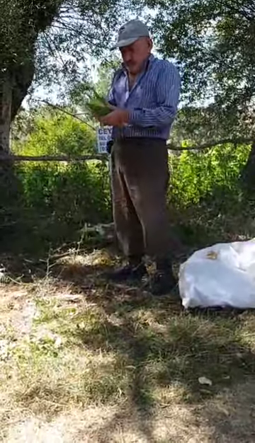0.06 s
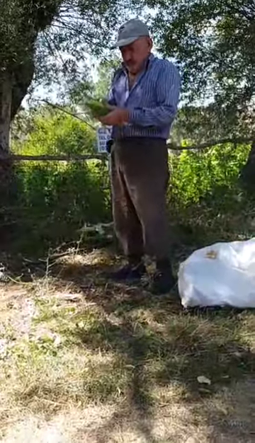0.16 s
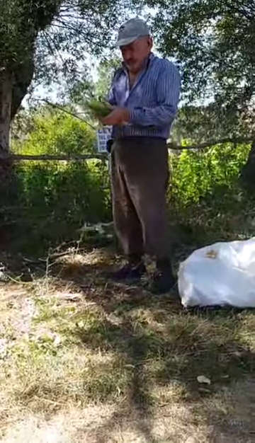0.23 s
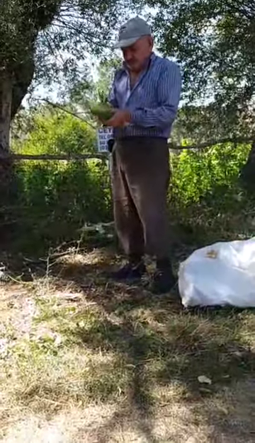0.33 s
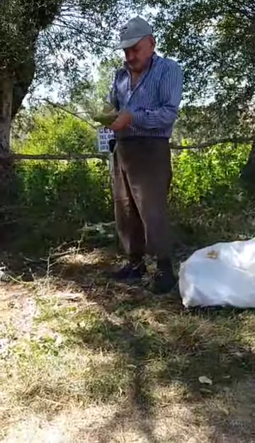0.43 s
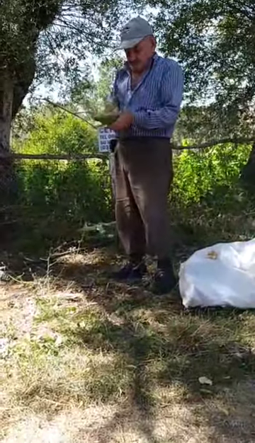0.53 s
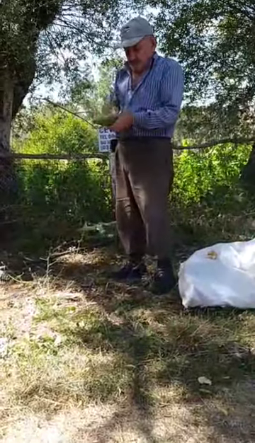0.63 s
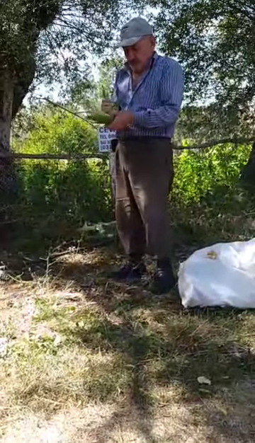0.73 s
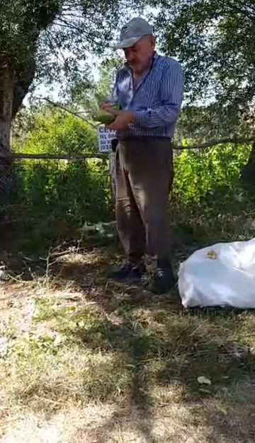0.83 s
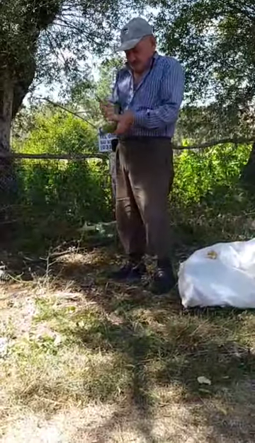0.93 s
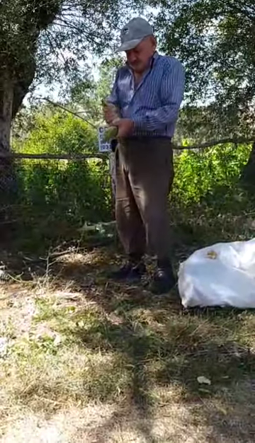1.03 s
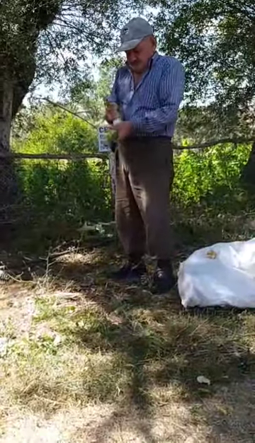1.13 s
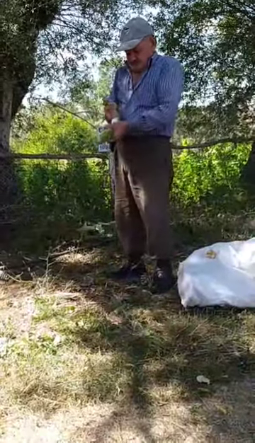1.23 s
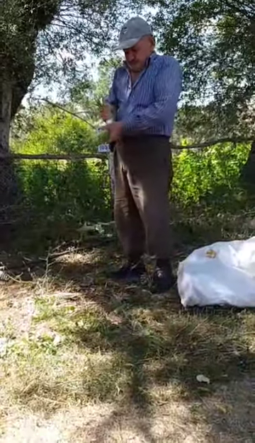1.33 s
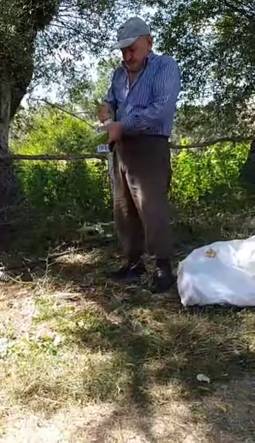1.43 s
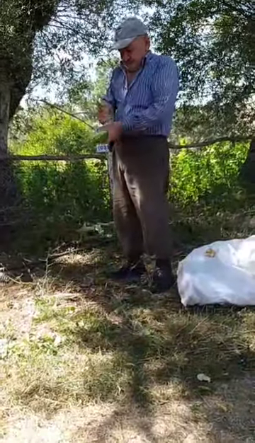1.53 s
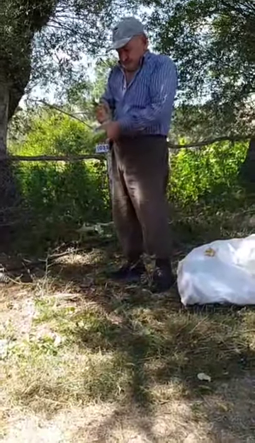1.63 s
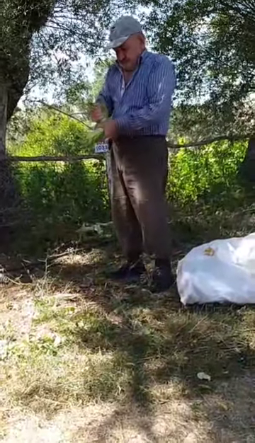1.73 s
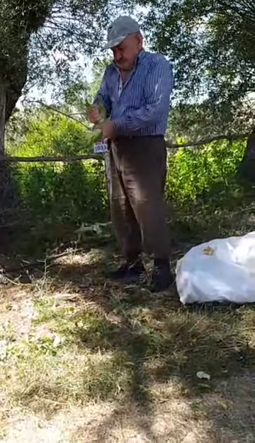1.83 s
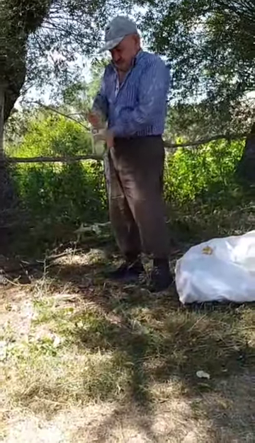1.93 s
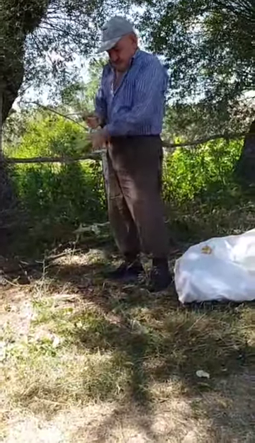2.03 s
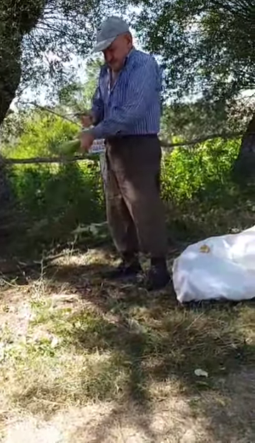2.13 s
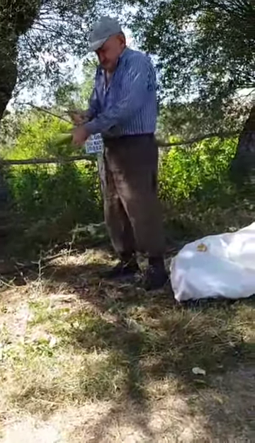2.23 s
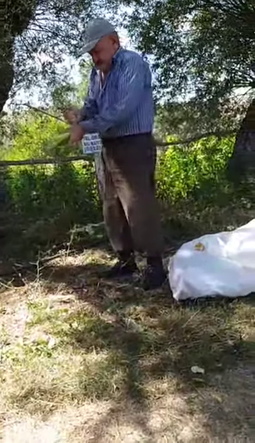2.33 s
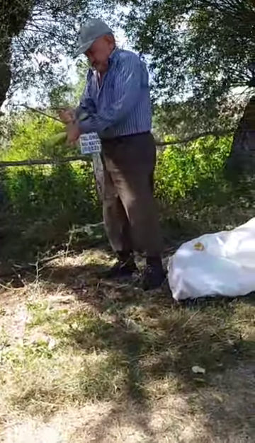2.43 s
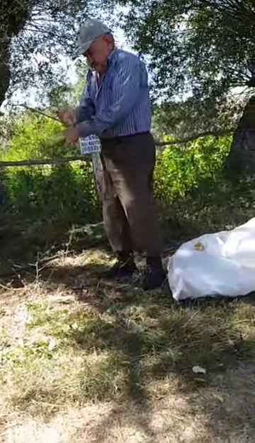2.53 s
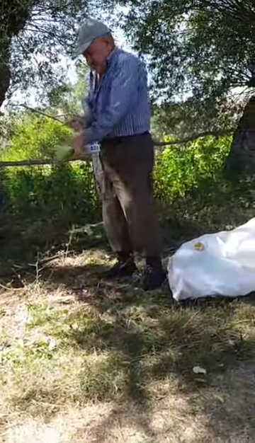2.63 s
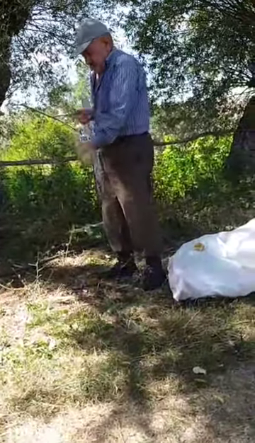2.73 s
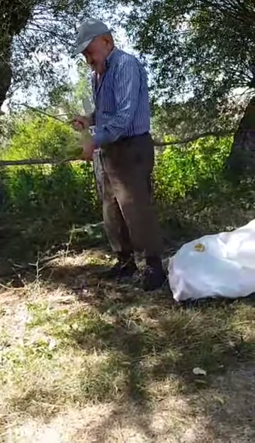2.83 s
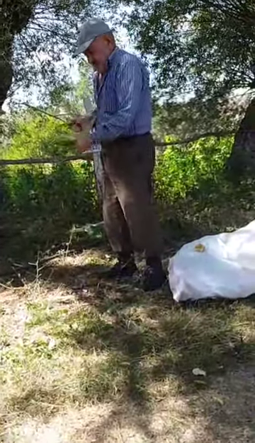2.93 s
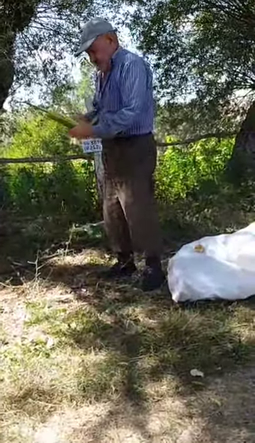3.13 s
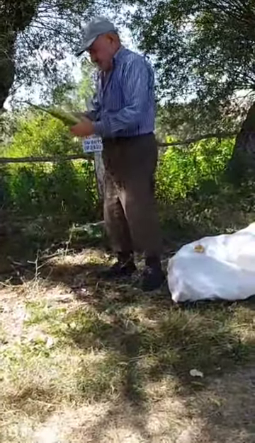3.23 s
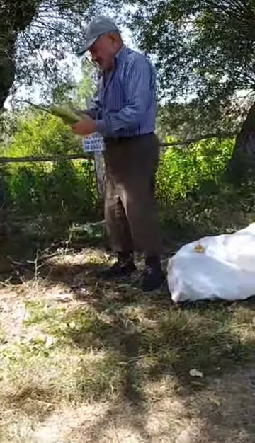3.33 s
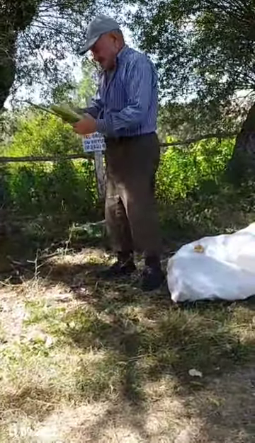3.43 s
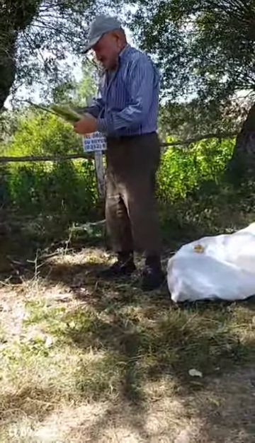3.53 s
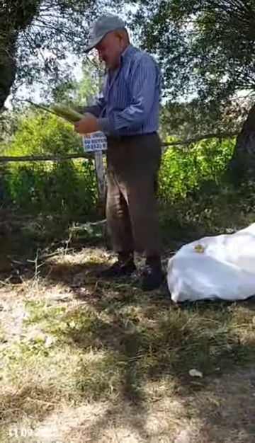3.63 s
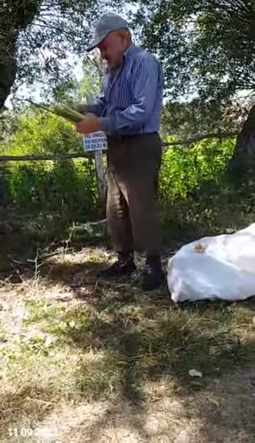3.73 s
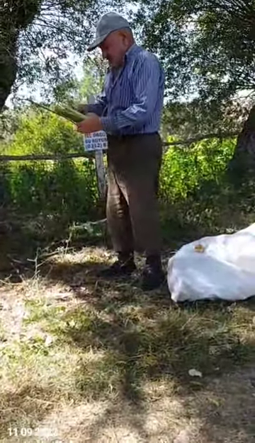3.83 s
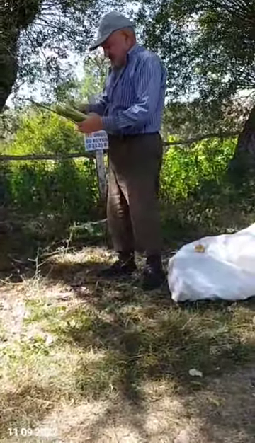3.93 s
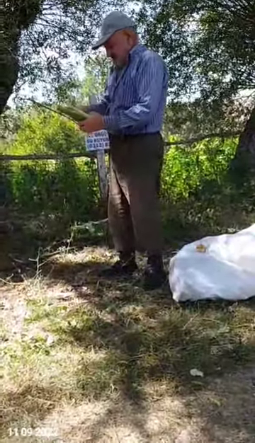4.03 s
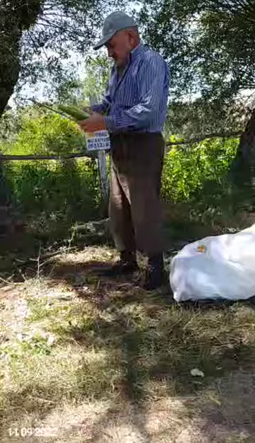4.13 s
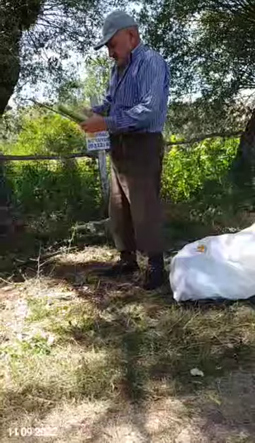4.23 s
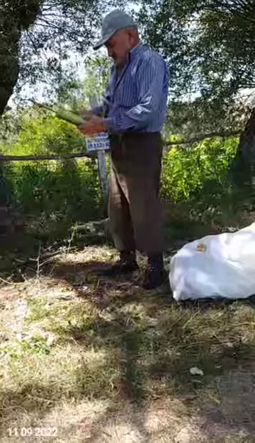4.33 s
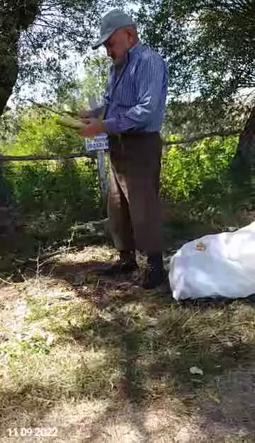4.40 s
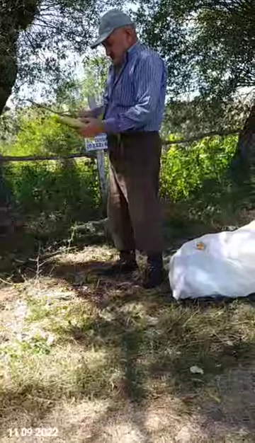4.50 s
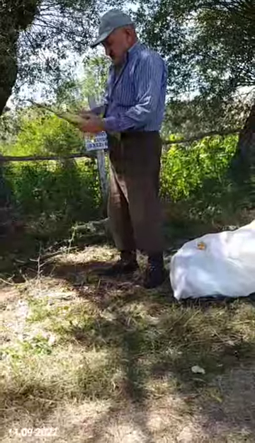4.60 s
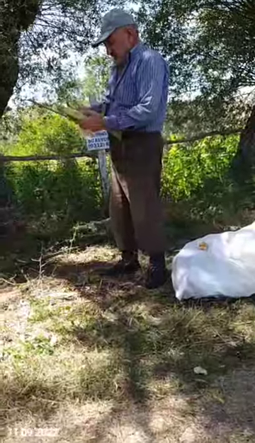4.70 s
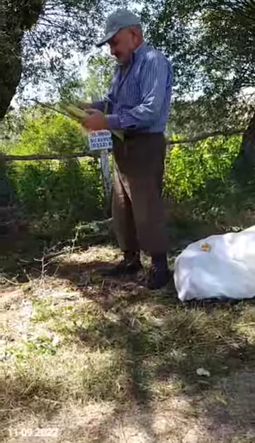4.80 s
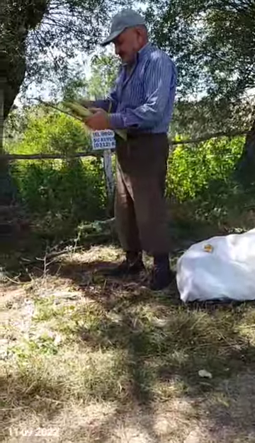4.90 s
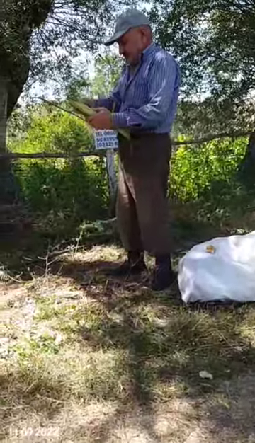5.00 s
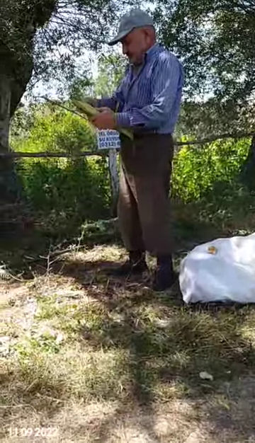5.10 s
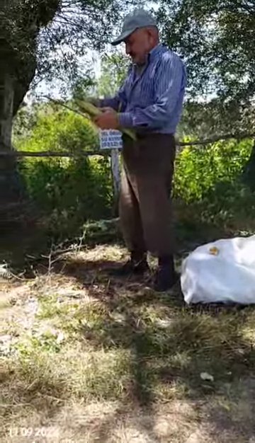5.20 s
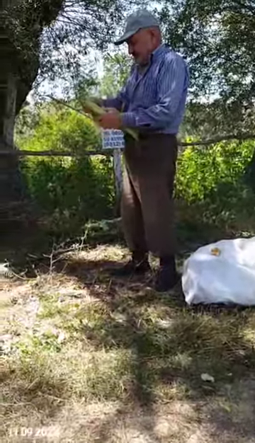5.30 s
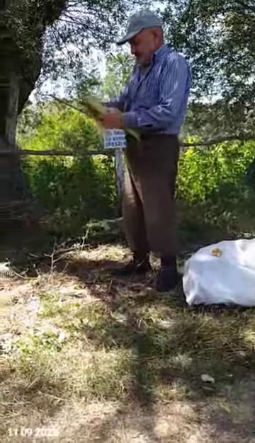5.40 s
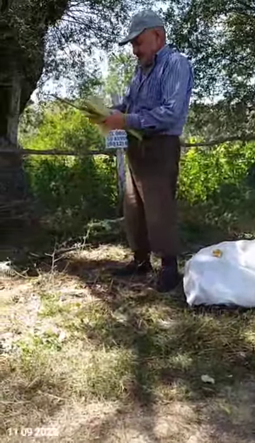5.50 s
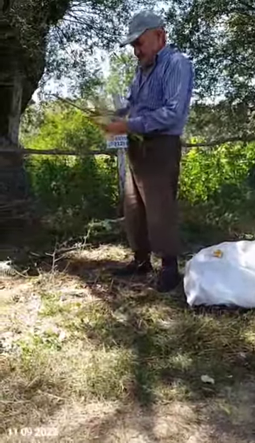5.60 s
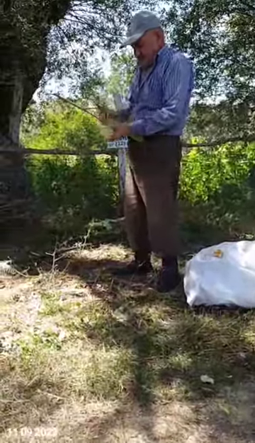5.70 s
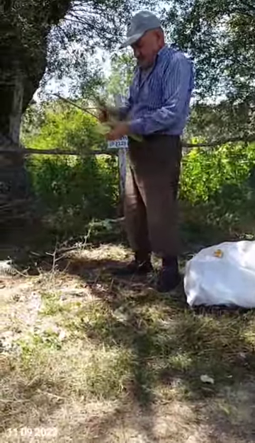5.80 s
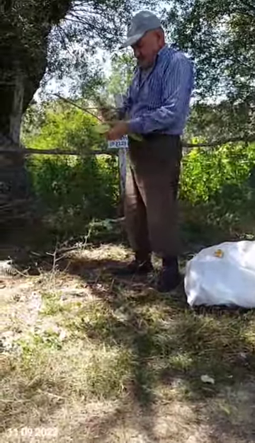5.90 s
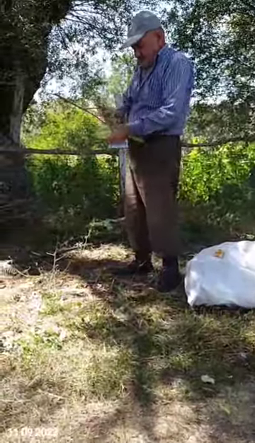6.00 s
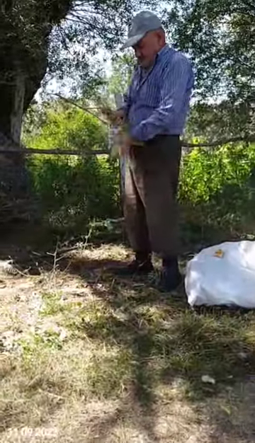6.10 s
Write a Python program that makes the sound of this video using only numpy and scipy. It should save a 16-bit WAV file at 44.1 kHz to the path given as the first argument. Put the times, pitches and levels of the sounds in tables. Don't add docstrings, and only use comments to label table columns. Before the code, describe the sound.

Dry, bright husk sounds come in uneven bursts: rustle, rip, crack, pause. The strongest tear is near the middle, where fibres burst and the stalk gives way with a short low rumble. After a calmer stretch of handling, leaves rustle and husks rip again with brief cracks and a small wet squeal. The open-air setting is quiet, with a low far hum, gentle wind buffeting the phone microphones early on, and steady hiss.

```python
import sys
import numpy as np
from scipy import signal
from scipy.fft import rfft, irfft
from scipy.io import wavfile
from scipy.ndimage import uniform_filter1d

SR = 44100
rng = np.random.default_rng(int(sys.argv[2]) if len(sys.argv) > 2 else 0)


def store_pcm(level_fs):
    pcm = np.round(np.clip(level_fs, -1, 1) * 32767).astype(np.int16)
    wavfile.write(sys.argv[1], SR, np.atleast_2d(pcm).T)


def decibels_to_gain(level_db):
    exponent = np.asarray(level_db, float) / 20
    return 10 ** exponent


N = 271215
TIME = np.arange(N) / SR

# (rise and fall span 20 dB, here and in every swell below)
RUSTLES = [(.1, -64, 0.45, 0.65, -12), (.362, -56, 0.26, 0.14, -11), (.82, -58.5, 0.073, 0.18, -10.5),
           (.944, -58, 0.093, 0.16, -12), (1.071, -54.5, 0.044, 0.077, -8.5),
           (1.402, -58.5, 0.45, 0.14, -9.5), (1.549, -49.5, 0.12, .15, -15),
           (1.805, -53.5, 0.017, 0.069, -18), (2.021, -52.5, 0.038, 0.042, -9), (2.09, -60, 0.04, 0.16, -9),
           (2.374, -56.5, 0.15, 0.035, -10.5), (2.72, -57, 0.072, .03, -28), (3.042, -54, .055, 0.068, -20),
           (3.95, -75.5, 0.055, 0.05, 11.5), (4.09, -62, 0.24, 0.16, -24), (4.26, -72, 0.88, 0.19, 2.5),
           (4.48, -50, 0.22, 0.14, -11.5), (4.95, -67.5, 1.7, 2, -7.5), (5.42, -68, 0.34, 0.1, -9),
           (5.5, -56, 0.085, 0.32, -10), (5.919, -57.5, 0.088, 0.093, -14), (5.99, -56.5, 0.05, 0.58, -31),
           (6.13, -66, 0.34, .3, 0.5)]
# start t/s, hold/s, fibre level/dB, release/s, sheet minus fibre/dB
RIPS = [(0.495, 0.095, -51.5, 0.17, -11), (0.558, 0.12, -55.5, -0.28, -7),
        (1.097, 0.072, -48.5, -0.25, -12), (1.17, 0.083, -46.5, -0.32, -9.5),
        (1.262, 0.0059, -47.5, 0.04, -14), (2.04, 0.023, -40, -0.2545, -10.5), (2.743, 0.016, -33.5, 0, -4),
        (2.763, 0.02, -33, 0.0185, -8.5), (5.57, 0.056, -48.5, 0.21, -10.5),
        (5.662, 0.023, -47.5, 0.12, -5), (5.683, 0.019, -44, .07, -10)]
# f/Hz, density/dB per Hz
FIBRE_COLOUR = [(1800, -64), (3000, -14), (3900, 5.5), (4800, -5.5), (6500, -5.1), (8000, -4), (10000, -1),
                (12500, -7), (15500, -8)]
# f/Hz, density/dB per Hz
SHEET_COLOUR = [(650, -14), (1000, 4), (1400, 2.4), (1900, 2.5), (2500, 4), (3100, 4.5), (4200, -25)]
# f/Hz, density/dB per Hz
COB_COLOUR = [(300, -25.5), (450, -10.5), (750, 8), (1000, 6), (1400, -20)]
# t/s, peak level/dB, middle minus top/dB
CRACKS = [(0.4825, -28.5, -26), (0.5821, -25, -11), (1.0947, -30.5, -6), (1.1229, -27.5, -8),
          (1.1454, -28, -11), (1.1817, -19.5, -24), (1.1924, -19.5, -14.5), (1.2411, -8, -21),
          (1.7921, -17.5, -21.5), (2.031, -28, -13), (2.0393, -9.5, -18), (2.0442, -10, -6),
          (5.618, -18, -9), (2.7345, -11, -14), (2.7391, -10.5, -16), (2.7478, -27, -18),
          (5.5887, -17, -40), (2.7675, -19, 1), (2.779, -25, -22), (2.7864, -15.5, -22), (4.592, -30, -37),
          (5.5036, -25.5, -22), (5.5857, -21, -31), (5.603, -23, -22), (5.6125, -18, -16.5),
          (5.6882, -29, -19), (5.6685, -17.5, -29), (5.744, -27.5, -3), (5.7698, -22, -16),
          (5.976, -33, -30)]
# f/Hz, density/dB per Hz
RIB_MIDDLE_COLOUR = [(700, -5), (1300, -5.5), (2200, 1.5), (3600, 7), (5500, -17.5), (7000, -11.5)]
# t/s, peak level/dB, f/Hz, t60/s, rise/ms
KNOCKS = [
    (0.68, -52.5, 370, 0.086, 4.5),
    (2.236, -45.5, 423, 0.036, 1.1),
    (2.546, -53.5, 260, 0.2, 2.9),
    (2.754, -54, 184, 0.066, 3.1),
    (2.81, -40.5, 415, 0.056, 9),
    (3.947, -38.5, 230, 0.028, 2.9),
]
# t/s, level/dB
STALK_BREAK = [
    (2.71, -64),
    (2.728, -62),
    (2.752, -36.5),
    (2.77, -29.5),
    (2.8, -38.5),
    (2.818, -34),
    (2.958, -59.5),
    (3.0, -57),
]
# f/Hz, density/dB per Hz
STALK_COLOUR = [(59, -37), (100, -25), (124, -21), (146, -7.5), (216, -8.5), (253, -10.5), (388, -4),
                (550, -26), (720, -46), (1210, -120)]
# t/s, pitch f/Hz, level/dB
SQUEAL = [
    (5.644, 1326, -65),
    (5.663, 1296, -42),
    (5.701, 1427, -43),
    (5.741, 1443, -56),
]
# f/Hz, gain/dB
SCATTER_COLOUR = [(300, -6), (1000, -3), (2500, -2), (3100, -10), (4000, -10), (5000, 0), (15000, 2)]
# t/s, level/dB
DRONE_LEVEL = [(0, -60.5), (.4, -61.5), (.75, -67), (.97, -62.5), (1.09, -66.5), (1.3, -59.5), (1.47, -53),
               (1.6, -58.5), (2.2, -60.5), (2.5, -62.5), (2.69, -57.5), (3.0, -59), (3.63, -59.5),
               (4.0, -63), (4.4, -62), (5.05, -65), (5.46, -59), (6.15, -62)]
# f/Hz, density/dB per Hz
DRONE_COLOUR = [(53, -66.5), (90, -9.5), (129, -13.5), (154, -3.5), (210, 1.5), (276, -2), (339, -12),
                (426, -21.5), (600, -46), (780, -74), (1320, -120)]
# peak t/s, upper minus drone/dB, rise/s, fall/s
UPPER_SWELLS = [
    (.12, -2, .3, 0.45),
    (.68, 6.5, 0.58, .6),
    (1.34, 9.5, 0.42, 0.08),
    (2.8, 11, 0.09, .15),
    (3.95, 7.5, 0.17, 0.077),
    (4.17, 12, 0.15, 0.73),
    (4.8, 1.5, 0.89, 2.6),
    (6.05, 0, 0.56, 1.2),
]
# f/Hz, density/dB per Hz
UPPER_DRONE_COLOUR = [(200, -28.5), (280, -3.5), (360, -6), (470, -11.5), (650, -28)]
# peak t/s, level/dB, rise/s, fall/s
GUSTS = [
    (.01, -57.5, .3, 0.2),
    (.26, -52, 0.065, 0.04),
    (.39, -52.5, 0.06, 0.33),
    (.82, -56, 0.15, 0.35),
    (1.09, -65, .4, 0.31),
    (1.37, -60, 0.088, 0.08),
    (2.24, -69, 0.19, 0.087),
]
# f/Hz, density/dB per Hz
WIND_COLOUR = [(5.9, -18.5), (10, 6), (36, -6), (57, -6.5), (109, -21), (140, -20), (180, -47), (310, -120)]
# f/Hz, density/dB per Hz
HISS_COLOUR = [(250, -16), (420, 6), (750, 6.5), (1500, -1), (3500, -1.3), (6000, -4), (9000, -2.5),
               (12000, -3.9), (16000, 5)]
# f/Hz, gain/dB
LEFT_PORT = [(100, .5), (380, 1.5), (800, -.3), (7800, .5), (9900, 5), (11000, .1), (12500, -6),
             (15500, -11)]
# f/Hz, gain/dB
RIGHT_PORT = [(100, -.5), (380, -1.5), (800, .3), (4000, 1.2), (6500, 3.5), (8000, 6.5), (9100, 11),
              (10000, 4), (11000, .1), (12500, -6), (15500, -11)]


def unit(x):
    return x / np.sqrt(np.mean(x ** 2, axis=-1, keepdims=True))


def colour(x, table):
    size = 8192
    hz, db = np.transpose(table)
    log_hz = np.log(np.fft.rfftfreq(size, 1 / SR) + 1)
    log_gain = np.interp(log_hz, np.log(hz), db) * np.log(10) / 20
    cepstrum = irfft(log_gain)
    cepstrum[1:size // 2] *= 2
    cepstrum[size // 2 + 1:] = 0
    response = irfft(np.exp(rfft(cepstrum)))[:size // 2]
    response = response.reshape((1,) * (x.ndim - 1) + (-1,))
    return signal.fftconvolve(x, response, axes=-1)[..., :N]


def walk(rate):
    k = int(SR / rate)
    steps = np.repeat(rng.standard_normal(N // k + 1), k)
    x = uniform_filter1d(uniform_filter1d(steps, k), k)[:N]
    return unit(x - x.mean())


def track(t, values, outside):
    inside = (TIME >= t[0]) & (TIME <= t[-1] + 0.015)
    return np.where(inside, np.interp(TIME, t, values), outside)


def swells(rows):
    power = np.zeros(N)
    for t, hold, db, rise, fall in rows:
        before = (t - TIME) / max(rise, 0.002)
        after = (TIME - t - hold) / max(fall, 0.002)
        slope = np.maximum(before, after)
        near = slope < 3
        power[near] += decibels_to_gain(db - 20 * np.maximum(slope[near], 0)) ** 2
    return np.sqrt(power)


def snaps(rate, spread_db, cluster_db, cluster_rate):
    breaks = rng.random(N) < rate / SR
    size = np.minimum(rng.exponential(size=N), 3.8)
    sign = np.sign(rng.standard_normal(N))
    jerks = np.clip(walk(cluster_rate), -3, 1.6)
    return breaks * sign * decibels_to_gain(spread_db * size) * decibels_to_gain(cluster_db * jerks)


def husks():
    fibre_moves, sheet_moves, cob_moves = [], [], []

    def add_move(t, hold, db, rise, fall, sheet_db, cob_db):
        fibre_moves.append((t, hold, db, rise, fall))
        sheet_moves.append((t, hold, db + sheet_db, rise, fall))
        cob_moves.append((t, hold, db + sheet_db + cob_db, rise, fall))

    for t, db, rise, fall, sheet_db in RUSTLES:
        add_move(t, 0, db, rise, fall, sheet_db, cob_db=-7)
    for t, hold, db, fall, sheet_db in RIPS:
        add_move(t, hold, db, 0.018, fall, sheet_db, cob_db=-9)
    sheet_moves.append((2.783, 0, -48.5, 0.037, 0.17))
    cob_moves.append((2.783, 0, -45.5, 0.037, 0.17))

    tear = snaps(6000, spread_db=2.8, cluster_db=2.1, cluster_rate=300)
    slide = snaps(5000, spread_db=1.2, cluster_db=0.5, cluster_rate=120)
    rub = 0.53 * unit(tear) + 0.89 * unit(slide)
    fibre = decibels_to_gain(-2.0) * swells(fibre_moves) * unit(colour(tear, FIBRE_COLOUR))
    sheet = decibels_to_gain(3.5) * swells(sheet_moves) * unit(colour(rub, SHEET_COLOUR))
    cob = decibels_to_gain(2.7) * swells(cob_moves) * unit(colour(rub, COB_COLOUR))
    return fibre + sheet + cob


def cracks():
    length, front_ms, tail_ms = 512, 0.3, 1.7
    top, middle = np.zeros(N + length), np.zeros(N + length)
    age_ms = np.arange(length) / SR * 1000
    shape = (1 - np.exp(-age_ms / front_ms)) * np.exp(-(age_ms / tail_ms) ** 2)
    for t, db, middle_db in CRACKS:
        burst = rng.standard_normal(length) * shape
        burst *= np.sqrt((8 + 20 * tail_ms) / np.sum(burst ** 2))
        i = int(t * SR)
        top[i:i + length] += decibels_to_gain(db) * burst
        middle[i:i + length] += decibels_to_gain(db + middle_db) * burst
    bright = decibels_to_gain(-13.0) * colour(top[:N], FIBRE_COLOUR)
    return bright + decibels_to_gain(0.5) * colour(middle[:N], RIB_MIDDLE_COLOUR)


def knocks():
    out = np.zeros(N)
    for t, db, hz, t60, rise_ms in KNOCKS:
        age = np.maximum(TIME - t, 0)
        ring = np.sin(2 * np.pi * hz * age) * np.exp(-np.log(1000) * age / t60)
        swell = 1 - np.exp(-1000 * age / rise_ms)
        tick = 0.43 * np.sin(2 * np.pi * 1300 * age) * np.exp(-age / 0.00034)
        out += decibels_to_gain(db + 9) * (ring * swell + tick)
    return out


def stalk_break():
    t, db = np.transpose(STALK_BREAK)
    tear = snaps(2500, spread_db=0.92, cluster_db=0.83, cluster_rate=56.0)
    return decibels_to_gain(track(t, db, -120) - 5.5) * unit(colour(tear, STALK_COLOUR))


def squeal():
    t, pitch_hz, level_db = np.transpose(SQUEAL)
    hz, db = track(t, pitch_hz, 0), track(t, level_db, -120)

    def mode(ratio, breakup_db):
        wavering_hz = ratio * hz * (1 + 0.084 * walk(200))
        tone = np.sin(2 * np.pi * np.cumsum(wavering_hz) / SR)
        return decibels_to_gain(breakup_db * walk(250)) * tone

    return decibels_to_gain(db - 1.0) * (mode(1, 3.5) + 0.59 * mode(1.7, 4))


def ports(x):
    left_lag = 6
    age = np.arange(4096) / SR
    decay = np.exp(-age / 0.0018) + 0.07 * np.exp(-age / 0.04)
    tails = rng.standard_normal((8, len(age))) * decay
    tails = signal.lfilter([1, -1], [1, -0.9], tails)
    tails = colour(tails, SCATTER_COLOUR)[:, :len(age)]
    tails = tails / np.sqrt(np.sum(tails ** 2, axis=1, keepdims=True))
    share = np.array([walk(45) for _ in tails])
    share = share / np.sqrt(np.mean(share ** 2, axis=0))
    paths = signal.fftconvolve(share * x, tails, axes=1)[:, :N].reshape(2, 4, N)
    direct = np.array([np.roll(x, left_lag), x])
    return direct + decibels_to_gain(-4.0) * paths.sum(axis=1)


def drone():
    level_db = np.interp(TIME, *np.transpose(DRONE_LEVEL))
    upper_gain = decibels_to_gain(-16) + swells([(t, 0, db, rise, fall) for t, db, rise, fall in UPPER_SWELLS])
    mid, side = unit(colour(rng.standard_normal((2, N)), DRONE_COLOUR))
    upper = decibels_to_gain(-8.5) * upper_gain * unit(colour(rng.standard_normal(N), UPPER_DRONE_COLOUR))
    spread = 0.2 * side * np.array([[1], [-1]])
    return decibels_to_gain(level_db - 0.5 + 0.54 * walk(11)) * (mid + upper + spread)


def wind():
    gain = decibels_to_gain(-66) + swells([(t, 0, db, rise, fall) for t, db, rise, fall in GUSTS])
    buffet_db = np.array([1.4 + 1.04 * walk(7), -0.1 + 3.0 * walk(7.05)])
    return gain * decibels_to_gain(3.5 + buffet_db) * unit(colour(rng.standard_normal((2, N)), WIND_COLOUR))


def hiss():
    return decibels_to_gain(-64.5 + 4.5) * unit(colour(rng.standard_normal((2, N)), HISS_COLOUR))


def scene():
    hands = husks() + cracks() + knocks() + stalk_break() + squeal()
    return decibels_to_gain(-2.46) * ports(hands) + drone() + wind() + hiss()


def roll_off(x):
    return signal.sosfilt(signal.butter(12, 15850, fs=SR, output="sos"), x)


def record(dry):
    ported = np.array([colour(dry[0], LEFT_PORT), colour(dry[1], RIGHT_PORT)])
    top_cut = signal.ellip(8, 0.2, 70, 15450, fs=SR, output="sos")
    return roll_off(signal.sosfilt(top_cut, ported))


dry = scene()
out = record(dry)
store_pcm(out)
```